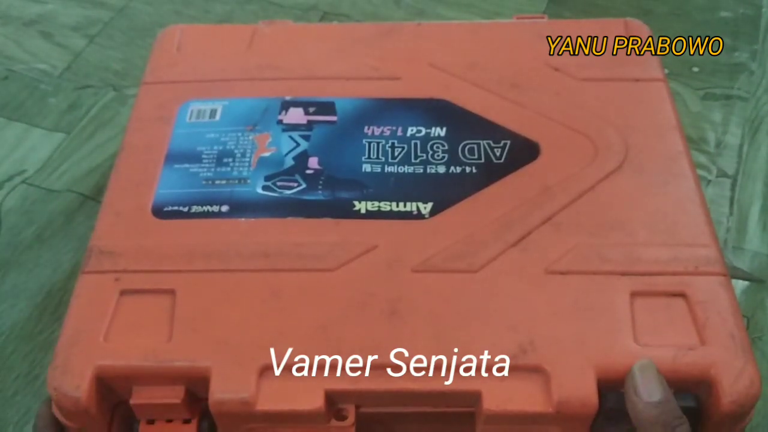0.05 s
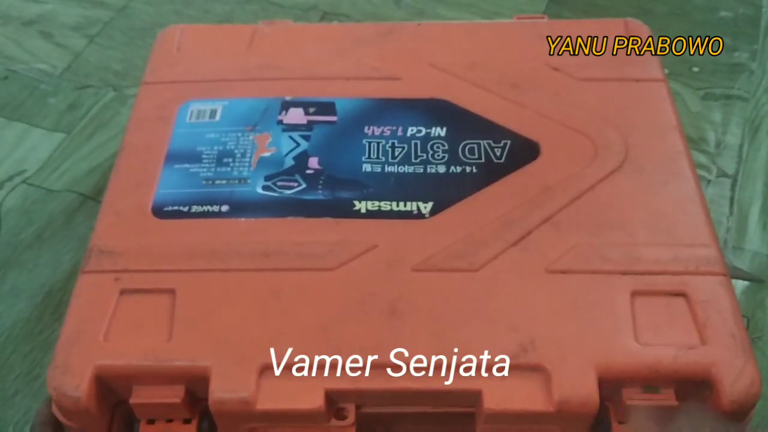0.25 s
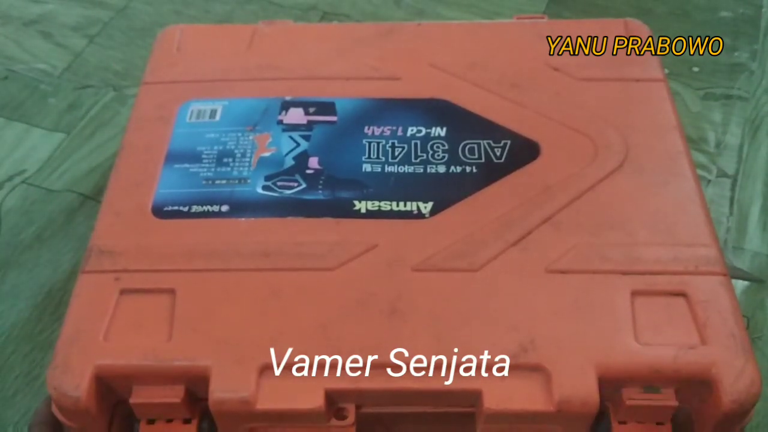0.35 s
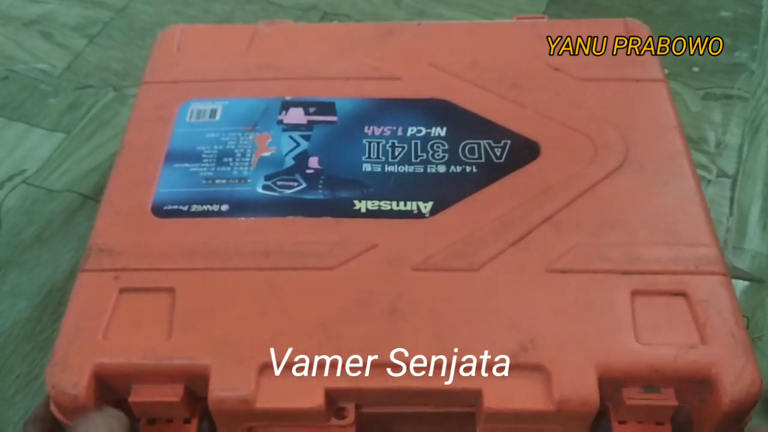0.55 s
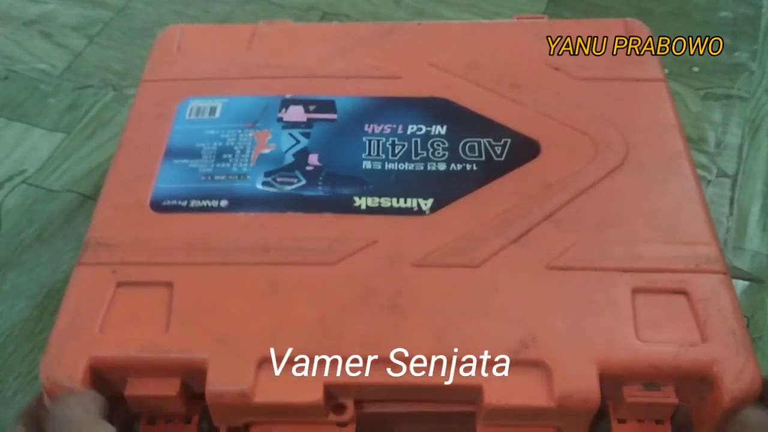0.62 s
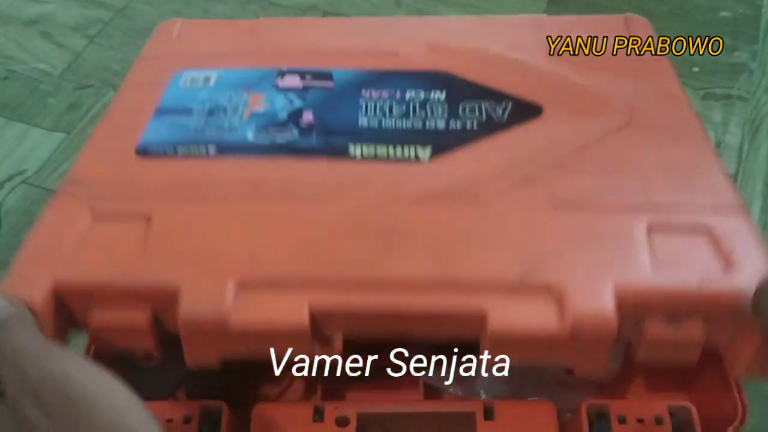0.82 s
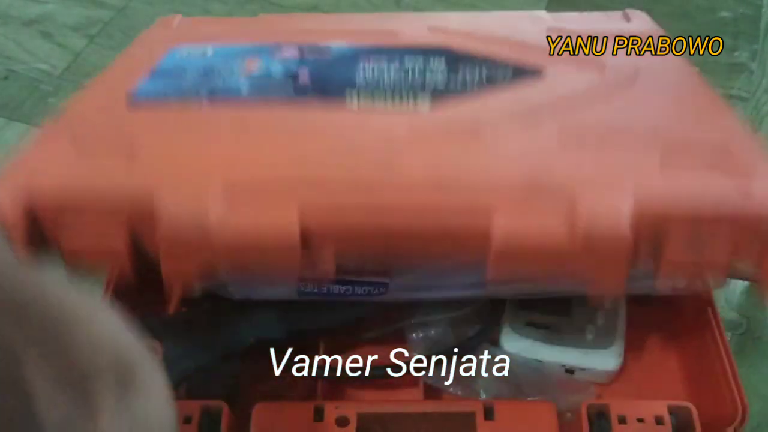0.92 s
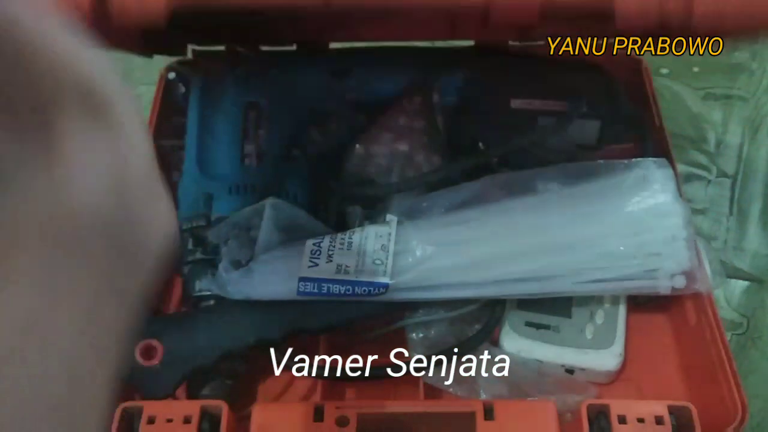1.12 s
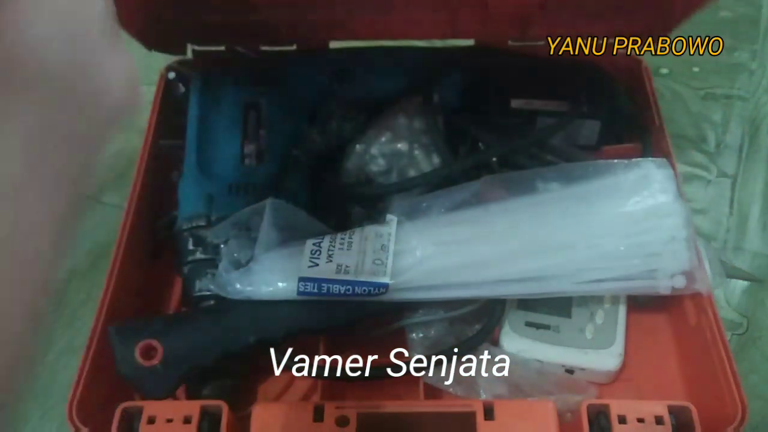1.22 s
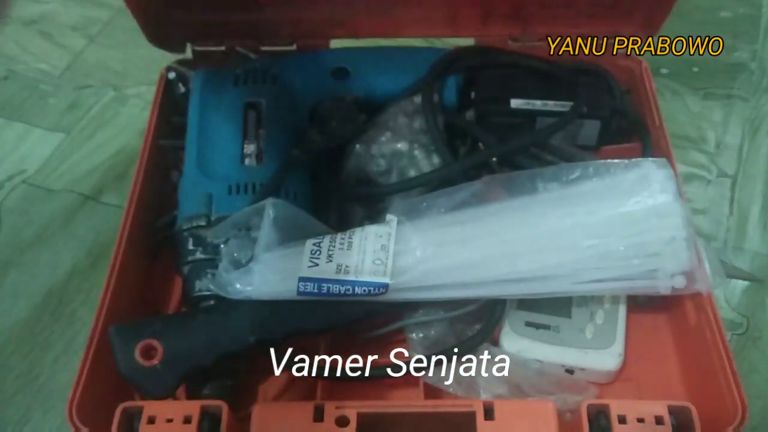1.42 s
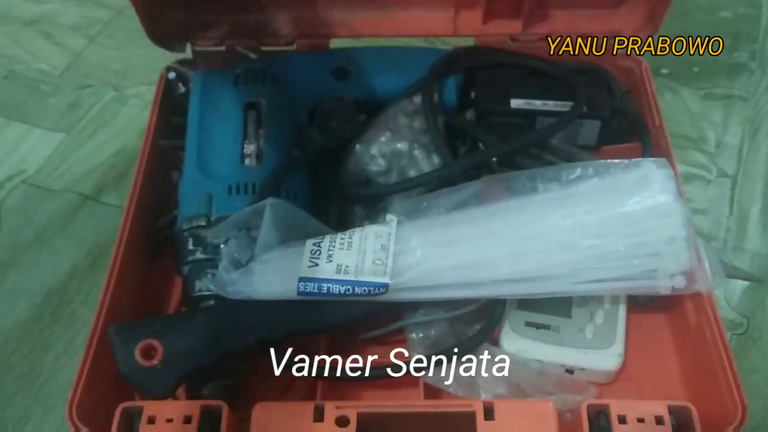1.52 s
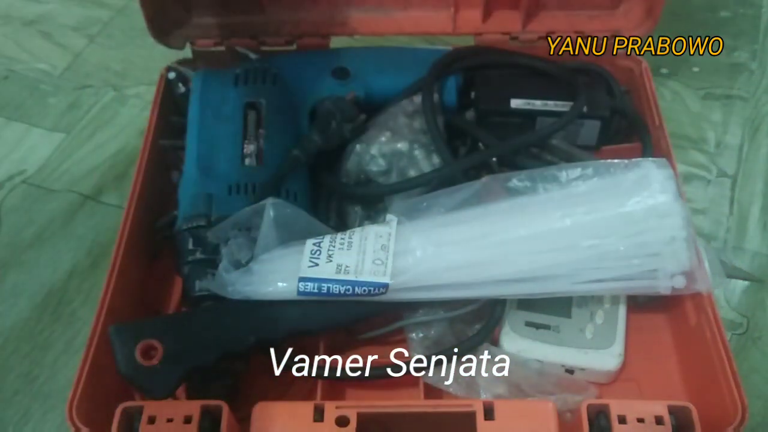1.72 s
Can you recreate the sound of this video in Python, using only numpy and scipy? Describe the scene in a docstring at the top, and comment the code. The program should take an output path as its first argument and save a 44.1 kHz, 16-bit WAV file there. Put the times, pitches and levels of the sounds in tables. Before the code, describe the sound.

A hard plastic tool case is opened close by in a small, slightly echoing room. Light clicks and hand scuffs come around 0.2 seconds, then two latches snap sharply at about 0.5 and 0.7 seconds. The lid clacks loose at 0.8 and knocks more softly against its stop at 1.1. From about 1 second a bag rustles faintly, and the hinge creaks quietly at 1.3 and 1.6.

```python
"""Opening a plastic tool case

A hard plastic case, close to the microphone in a small bare room. Two latches snap free, the lid jerks loose
and swings back against its stop. Each knock rings the hollow shell, the flat panels and the struck part. Hands
and plastic scuff in between, the plastic creaks, a bag inside rustles faintly."""
import sys
import numpy as np
from scipy import signal
from scipy.fft import rfft, irfft, next_fast_len
from scipy.io import wavfile

SR = 44100
rng = np.random.default_rng(int(sys.argv[2]) if len(sys.argv) > 2 else 0)


def pcm_store(signal):
    """Save signal as 16-bit PCM."""
    levels = np.round(np.clip(np.atleast_2d(signal), -1, 1) * 32767)
    wavfile.write(sys.argv[1], SR, levels.astype(np.int16).T)


N = 77175


def undb(db):
    """Decibels to gain."""
    return 10 ** (np.asarray(db) / 20)


def unit_rms(x):
    """Scale to an rms of one."""
    return x / np.sqrt(np.mean(x ** 2))


def unit_blow(x):
    """Scale to the energy of a 3 ms burst at full level."""
    return x / np.sqrt(np.sum(x ** 2) / (.003 * SR))


def band(x, edges_hz):
    """Causal band-pass between two edges."""
    sos = signal.butter(3, np.clip(edges_hz, 20, SR / 2 - 100), btype="band", fs=SR, output="sos")
    return signal.sosfilt(sos, x)


def colour(x, points):
    """Minimum-phase filter through (freq_hz, gain_db) points."""
    size = next_fast_len(2 * len(x))
    size += size % 2
    hz, db = np.array(points).T
    bins_hz = np.maximum(np.arange(size // 2 + 1) * SR / size, 1)
    gain = undb(np.interp(np.log(bins_hz), np.log(hz), db))
    cepstrum = irfft(np.log(gain))
    cepstrum[1:size // 2] *= 2  # folding onto positive time makes the filter causal
    cepstrum[size // 2 + 1:] = 0
    return irfft(rfft(x, size) * np.exp(rfft(cepstrum)))[:len(x)]


def fade(t, t60):
    """Exponential decay by 60 dB in t60 seconds."""
    return np.exp(-np.log(1000) * t / t60)


def mode(t, hz, t60):
    """One damped resonance."""
    return fade(t, t60) * np.sin(2 * np.pi * hz * t)


def add(out, start_s, x):
    """Mix a sound in at its time."""
    i = max(int(start_s * SR), 0)
    out[i:i + len(x)] += x[:max(N - i, 0)]


# Steady background of the room: freq_hz, gain_db
ROOM_TONE = [(40, -36), (110, -19.5), (210, 0.5), (450, -0.5), (750, -10), (1400, -12), (2600, -18.5),
             (6000, -15.5), (11000, -19), (15500, -13.5)]


def room_tone(level_db=-57):
    """The quiet of the place: a low, even rush with a little hiss."""
    return undb(level_db) * unit_rms(colour(rng.standard_normal(N), ROOM_TONE))


# Reverberation of the small bare room: centre_hz, level_db, t60_s
ROOM_DECAY = [(155, -13, 0.68), (262, -6, 0.42), (594, 1, 0.31), (1090, -1, 0.44), (2020, -4, 0.4),
              (3430, -4, 0.4), (4760, -9.5, 0.43), (9200, -5.5, 0.36), (15100, -13, 0.37)]


def room(delay_s=0.0033, build_s=0.0024):
    """Dense reflections from nearby walls and floor; returns a function that gives a sound's echo."""
    centres_hz, levels_db, t60s = np.array(ROOM_DECAY).T
    late = np.maximum(np.arange(SR // 2) / SR - delay_s, 0)
    spectrum = rfft(rng.standard_normal(2 * SR))
    log_hz = np.log(np.arange(len(spectrum)) / 2 + 1)
    weights = [np.interp(log_hz, np.log(centres_hz), row) for row in np.eye(len(centres_hz))]
    noise_bands = np.array([irfft(spectrum * weight) for weight in weights])
    envelopes = np.array([fade(late, t60) * (1 - np.exp(-late / build_s)) for t60 in t60s])
    envelopes *= (undb(levels_db) / np.linalg.norm(envelopes, axis=1))[:, None]

    def echo(x):
        """Every spot reaches the microphone by its own paths, so each call draws new reflections."""
        i = rng.integers(SR)
        response = np.sum(noise_bands[:, i:i + len(late)] * envelopes, axis=0)
        return signal.fftconvolve(x, response)
    return echo


def friction(slip_samples=60, uneven_db=1):
    """Friction noise: tiny slips of uneven strength."""
    noise = rng.standard_normal(N)
    slips_db = uneven_db * rng.standard_normal(N // slip_samples + 1)
    return noise * undb(np.repeat(slips_db, slip_samples)[:N])


# Course of the rustle inside the case: time_s, level_db
BAG_LEVELS = [(.92, -61), (1.0, -48.5), (1.149, -59.5), (1.3, -58.5), (1.471, -61.5), (1.62, -58),
              (1.75, -57.5)]
# Spectrum of the thin plastic: freq_hz, gain_db
BAG_SPECTRUM = [(100, -25), (900, -18), (3000, -10.5), (7000, -14.5), (9500, -0.5), (11300, -2),
                (13000, -5), (16000, -19)]


def bag():
    """A thin bag and cable ties rustle faintly, most as the lid comes off them."""
    times_s, levels_db = np.array(BAG_LEVELS).T
    envelope = undb(np.interp(np.arange(N) / SR, times_s, levels_db))
    return unit_rms(colour(friction(), BAG_SPECTRUM)) * envelope


# Plastic creaks: start_s, pitch_hz, slip_db
CREAKS = [(0.187, 10760, -52), (1.325, 1734, -59.5), (1.622, 1985, -64)]


def creaks(longest_gap_s=0.0019, t60_s=0.039):
    """Plastic sticks and slips under the thumb and as the lid settles; each slip rings one resonance."""
    t, out = np.arange(SR // 10) / SR, np.zeros(N)
    for start_s, pitch_hz, slip_db in CREAKS:
        slip = undb(slip_db) * unit_blow(mode(t, pitch_hz, t60_s))
        gaps_s = longest_gap_s * rng.uniform(0.57, 1, size=9)
        for slip_s in start_s + np.cumsum(gaps_s):
            add(out, slip_s, slip)
    return out


# Ranges of the shell, panels, latch and contact tick, a row each: low_hz, high_hz
CASE_BANDS = [(200, 530), (680, 1820), (2500, 6380), (6800, 16000)]
# Hands and plastic rubbing: start_s, length_s, shell_db, panel_db, latch_db, tick_db
SCUFFS = [ (0.000, 0.057, -46, -48.5, -51.5, -56), (0.187, 0.017, -38.5, -45, -53, -50),
          (0.258, 0.72, -53, -64, -73, -89), (0.513, 0.063, -37, -39.5, -77, -51),
          (0.681, 0.071, -44.5, -56, -45.5, -65), (0.797, 0.049, -36, -43.5, -49, -42.5),
          (0.848, 0.06, -38, -51, -45, -55), (0.95, 0.0066, -74, -63, -50, -44),
          (0.962, 0.028, -50, -46.5, -45.5, -39.5), (0.999, 0.053, -49.5, -65, -55.5, -71),
          (1.325, 0.058, -64, -60.5, -64, -61), (1.61, 0.11, -77, -61.5, -57.5, -58.5)]


def scuffs(rise_share=0.028):
    """Rubs that start quickly, hold and fade, sounding through the four ranges of the case."""
    t, out = np.arange(N) / SR, np.zeros(N)
    noise_bands = np.array([unit_rms(band(friction(), edges)) for edges in CASE_BANDS])
    for start_s, length_s, *levels_db in SCUFFS:
        rise = np.clip((t - start_s) / (rise_share * length_s), 0, 1)
        fall = np.clip(2 * (1 - (t - start_s) / length_s), 0, 1)
        out += rise * fall * (undb(levels_db) @ noise_bands)
    return out


def ring(t, modes, pitch_ratio=1, scatter_db=3, detune=0.016):
    """Damped modes of alternating sign; each blow excites them a little differently."""
    out = np.zeros(len(t))
    for k, (hz, db, t60) in enumerate(modes):
        gain = undb(db + scatter_db * rng.standard_normal())
        pitch_hz = hz * pitch_ratio * (1 + detune * rng.standard_normal())
        out += (-1) ** k * gain * mode(t, pitch_hz, t60)
    return unit_blow(out)


def crack(t, edges_hz, t60):
    """The many heavily damped modes of plastic: a short burst of noise."""
    burst = rng.choice([-1., 1.], len(t)) * fade(t, t60)
    return unit_blow(band(burst + 1e-18, edges_hz))


# Modes of the hollow shell: pitch_hz, level_db, t60_s
SHELL_MODES = [(226, -8, 0.074), (277.9, -2, 0.068), (335.5, 1, 0.036), (418, -11.5, 0.078)]


def shell_thump(t, pitch_ratio, crack_db=-8.5, rise_s=0.0019, radiates_hz=(200, 1500)):
    """The hollow shell answers a blow with low modes and a dull crack."""
    modes = ring(t, SHELL_MODES, pitch_ratio)
    burst = undb(crack_db) * crack(t, CASE_BANDS[0], t60=0.045)
    rise = 1 - np.exp(-t / rise_s)
    return band((modes + burst) * rise, radiates_hz)


# Modes of the flat panels: pitch_hz, level_db, t60_s
PANEL_MODES = [(734.5, -12.5, 0.22), (780, -18, 0.072), (929, -5, 0.11), (1066, 6.5, 0.033),
               (1162, -10, 0.15), (1312, 1, 0.03), (1830, -9, 0.062)]
# Clusters of damped panel modes: low_hz, high_hz, level_db
PANEL_CLUSTERS = [(737, 1395, -1), (1770, 2495, -8.5)]


def panel_clack(t, crack_t60_s):
    """The flat panels ring, and crack in two clusters."""
    modes = ring(t, PANEL_MODES)
    return modes + sum(undb(db) * crack(t, (low, high), crack_t60_s) for low, high, db in PANEL_CLUSTERS)


# Modes of each struck part, by name: pitch_hz, level_db (against the crack), t60_s
PART_MODES = { "latch tab": [(880, -2, .04), (2810, 1.5, 0.015), (7300, 2, 0.0038)],
              "catch": [(950, 10, 0.011), (1690, 1, .025), (3530, 0, .01), (4320, -4, 0.015),
              (5360, -1, 0.0042), (6730, 3.5, 0.0039), (8570, 0, 0.0094), (11900, -3, 0.0064)],
              "right latch": [(1033, 4.5, 0.0073), (3040, 4.5, 0.0089), (3630, -4.5, 0.026),
              (6140, -5, .008), (7870, -4, 0.0039), (10200, -1.5, 0.0023)],
              "left latch": [(1240, 5.5, 0.0075), (1844, -12.5, 0.034), (3310, 6, 0.021), (4350, 9, .009),
              (7900, 3, 0.0036), (8980, 1, 0.0042)], "rim": [(910, 3.5, 0.014), (1984, 1, 0.0079),
              (2880, -3.5, 0.0051), (6100, -3, 0.0022), (10680, -3, 0.0043)], "flap": [(1297, 4.5, 0.021),
              (3230, -2, 0.0092), (4640, -5, 0.0035), (6280, -13, .012), (9060, 3, 0.0038)],
              "hinge": [(1035, 11, 0.035), (1604, 5, 0.026), (3090, 5.5, 0.013), (10100, -0.5, 0.0044)],
              "stop": [(1280, 4, 0.0095), (2064, -8, 0.14), (2930, 0, 0.044), (6150, -4, 0.03),
              (12400, -6, 0.0043)], "lid": [(684, 8, 0.062)]}


def struck_part(t, part, splits_hz=(2450, 6500)):
    """The struck part's own modes, sorted into the panel, latch and tick ranges."""
    ranges = np.zeros((3, len(t)))
    for k, (hz, db, t60) in enumerate(PART_MODES[part]):
        ranges[np.searchsorted(splits_hz, hz)] += (-1) ** k * undb(db) * unit_blow(mode(t, hz, t60))
    return ranges


# Blows of latches and lid, close to the microphone:
# start_s, part, shell_db, panel_db, latch_db, tick_db, latch_crack_t60_ms, shell_pitch_ratio, room_db
KNOCKS = [ (0.04, "flap", -40, -49, -50.5, -63, 4.4, 0.74, 5),
          (0.1960, "flap", -29, -33.5, -50.5, -39, 9.1, 0.889, -0.5),
          (0.2057, "rim", -24.5, -43, -39, -34, 12, 1.01, -4),
          (0.228, "lid", -26, -40, -54, -58, 8.5, 0.9, -6),
          (0.386, "latch tab", -40, -45.5, -41, -44, 7.1, 1.07, -6),
          (0.4342, "catch", -24, -23.5, -23.5, -23, 12.6, 1.08, -2.5),
          (0.4950, "right latch", -14.5, -21.5, -17, -19.5, 11, 0.98, -2.5),
          (0.5633, "right latch", -31, -36, -35, -40, 17, 1, -1.5),
          (0.6503, "latch tab", -22, -30.5, -34, -42.5, 13, 0.98, -4.5),
          (0.6700, "catch", -23.5, -47, -58, -64, 3.3, 1.086, 2.5),
          (0.6853, "left latch", -16.5, -19.5, -21, -21, 18, 1.05, -4.5),
          (0.7393, "rim", -28, -32, -36.5, -33.5, 5.3, 1, 1),
          (0.798, "lid", -22.5, -42, -64, -62, 3.6, .9, -2),
          (0.8148, "rim", -18, -15, -30.5, -24, 6.6, 0.9, -5.5),
          (0.8180, "rim", -26, -22.5, -23.5, -21.5, 9.9, 1.04, -2.5),
          (0.8314, "catch", -35, -22.5, -49, -50, 6.1, 1.2, -4.5),
          (0.8472, "flap", -35.5, -18, -22, -20.5, 16, 1.3, -4),
          (0.9637, "hinge", -37.5, -30.5, -31, -34.5, 14, 1.4, -2),
          (1.017, "lid", -40, -61, -66, -70, 7.6, 1.2, -1),
          (1.0972, "stop", -50, -28, -34.5, -33, 48, 1.13, -1),
          (1.103, "stop", -43, -37, -37.5, -49, 19, 1.25, -6),
          (1.1245, "lid", -38, -36.5, -43.5, -55, 22, 1.3, -1.5),
          (1.2115, "lid", -54, -42, -64, -62, 10, 1, -2.5)]


def knocks(echo, contact_rise_s=0.00036, snap_send_db=-7, spread_send_db=-0.5):
    """Latch snaps and lid knocks: the struck part rings over the shell, the panels and a short crack."""
    t, out = np.arange(SR // 5) / SR, np.zeros(N)
    contact = 1 - np.exp(-t / contact_rise_s)
    latch_band, tick_band = CASE_BANDS[2:]
    impulse = signal.unit_impulse(len(t)) + 1e-18
    latch_spread = unit_blow(band(impulse, latch_band))
    tick_spread = unit_blow(band(impulse, tick_band))
    for start_s, part, shell_db, panel_db, latch_db, tick_db, crack_ms, pitch_ratio, room_db in KNOCKS:
        crack_s = crack_ms / 1000
        part_low, part_mid, part_high = struck_part(t, part)
        shell = shell_thump(t, pitch_ratio)
        panel = (part_low + panel_clack(t, 2 * crack_s)) * contact
        latch = (part_mid + crack(t, latch_band, crack_s)) * contact
        tick = (part_high + crack(t, tick_band, 0.95 * crack_s)) * contact
        body = undb(shell_db) * unit_blow(shell) + undb(panel_db) * unit_blow(panel)
        snap = undb(latch_db) * unit_blow(latch) + undb(tick_db) * unit_blow(tick)
        add(out, start_s, body + snap)
        # The walls return the snap as heard close up, and its smooth average over all directions.
        spread_echo = undb(latch_db) * echo(latch_spread) + undb(tick_db) * echo(tick_spread)
        knock_echo = echo(body + undb(snap_send_db) * snap)
        add(out, start_s, undb(room_db) * (knock_echo + undb(spread_send_db) * spread_echo))
    return out


def scene(rub_send_db=-1):
    """The case close up, its echo from the walls and the room tone behind it."""
    echo = room()
    rubs = scuffs() + creaks()
    mix = room_tone() + rubs + undb(rub_send_db) * echo(rubs)[:N] + bag() + knocks(echo)
    return mix[None]


# Response of the microphone: freq_hz, gain_db
MIC_RESPONSE = [(30, 0), (100, -2.5), (150, -1), (205, 1), (600, -4.5), (2000, 2), (5000, -2.5),
                (8000, 1.5), (12000, 1.5), (15000, -8)]


def record(dry, top_hz=15700):
    """One small microphone near the case, with a gently uneven response and a steep cut at the top."""
    top_cut = signal.ellip(8, .2, 70, top_hz, fs=SR, output="sos")
    return signal.sosfilt(top_cut, colour(dry[0], MIC_RESPONSE))[None]


dry = scene()
out = record(dry)
pcm_store(out)
```